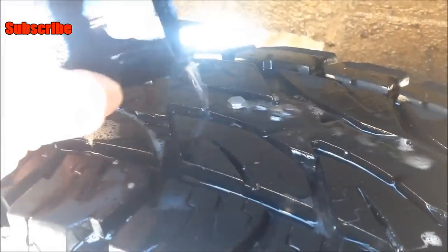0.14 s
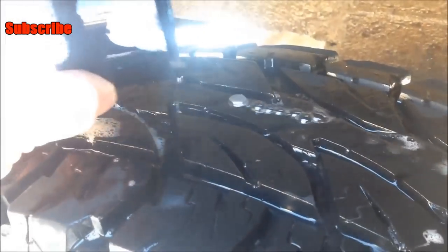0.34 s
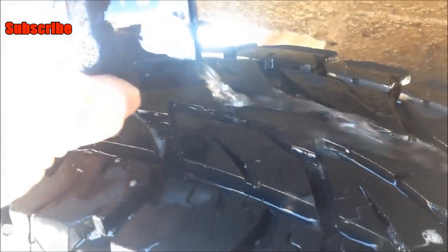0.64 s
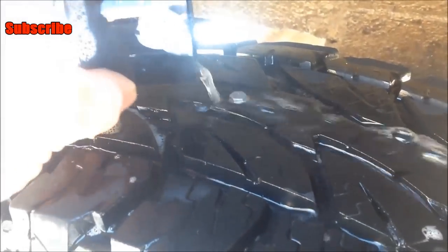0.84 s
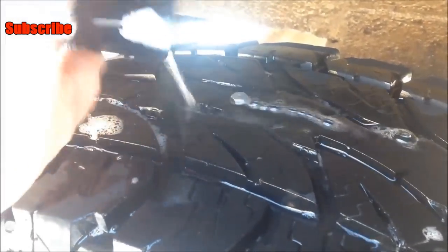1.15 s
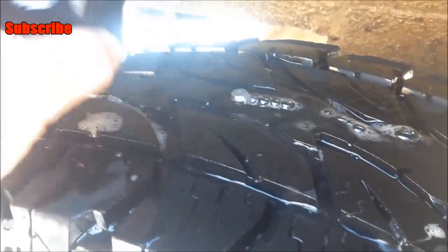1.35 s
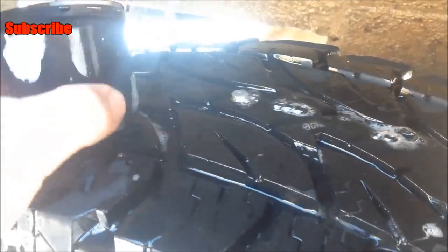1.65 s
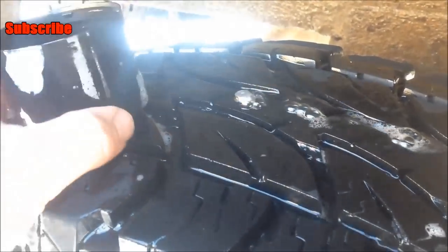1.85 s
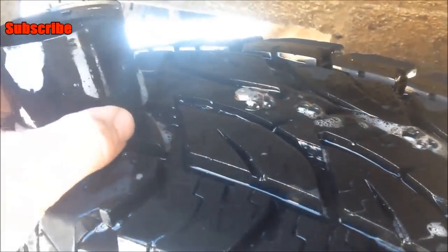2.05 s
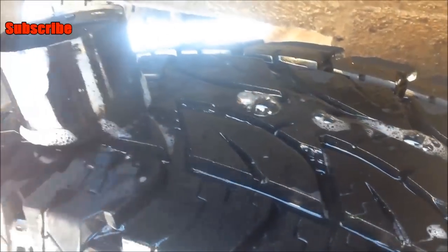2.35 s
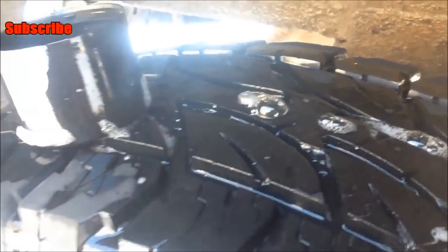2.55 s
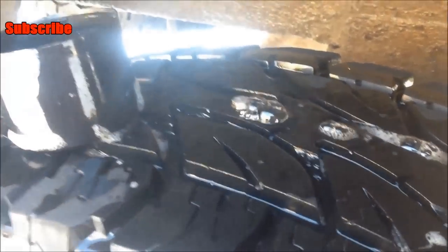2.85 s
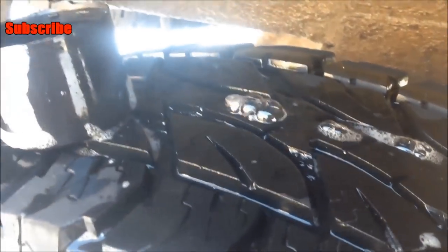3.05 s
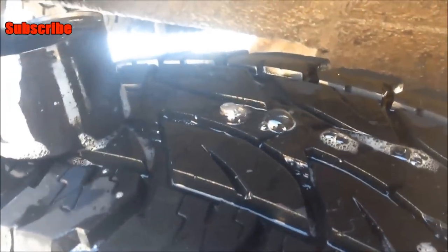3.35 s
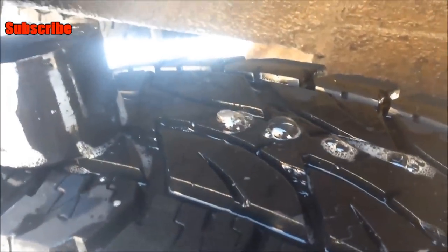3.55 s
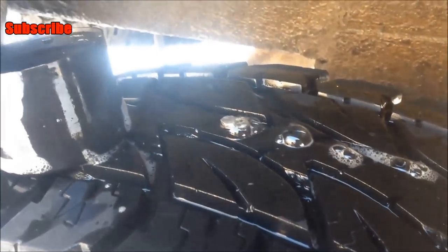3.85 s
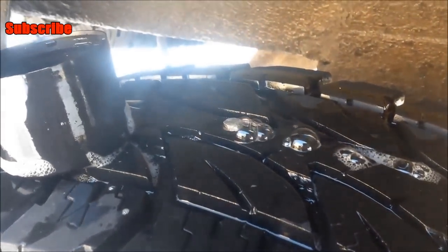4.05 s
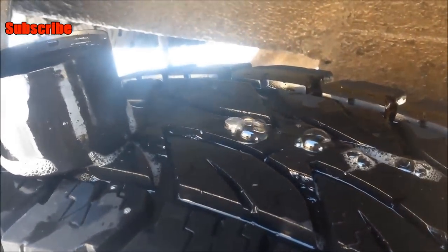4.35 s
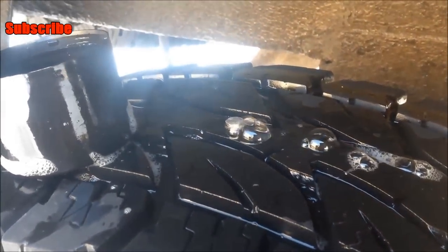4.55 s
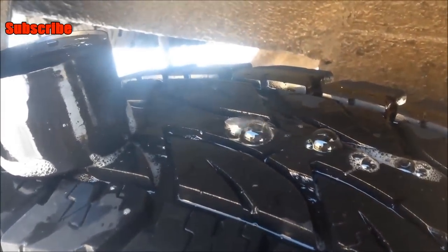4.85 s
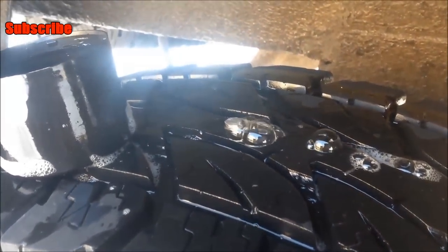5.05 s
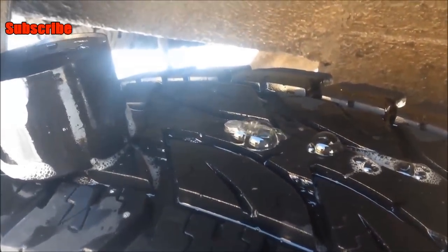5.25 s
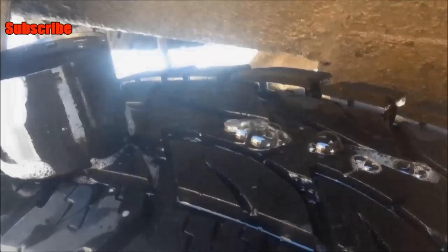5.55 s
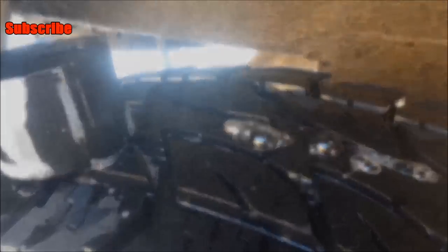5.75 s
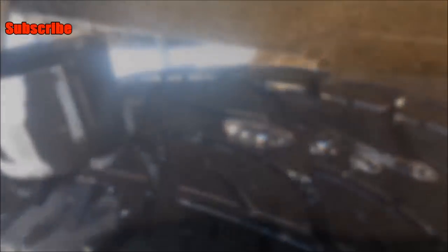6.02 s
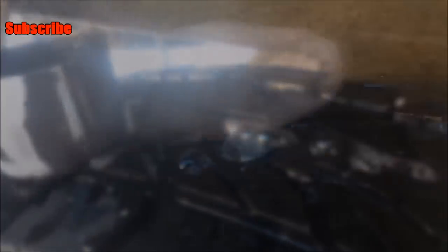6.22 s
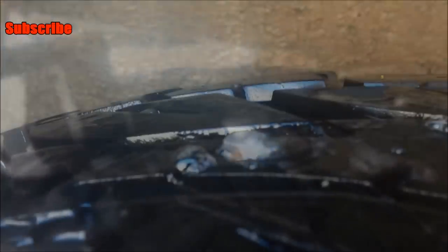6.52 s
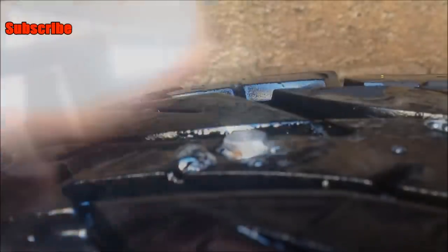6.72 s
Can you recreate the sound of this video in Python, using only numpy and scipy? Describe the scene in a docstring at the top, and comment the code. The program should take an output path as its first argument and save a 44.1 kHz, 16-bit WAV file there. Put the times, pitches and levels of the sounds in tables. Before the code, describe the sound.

A tire puncture covered in soapy water spits a quick, wet stream of tiny bubbles, heard up close. After a brief lull, bright pops come in rapid clusters, with crackling foam and a faint, fluttering hiss of air. A single soft bump touches the microphone. Outdoor road noise stays low behind the leak until it suddenly rises and hums toward the end.

```python
"""Outdoors, close to a small camera, air leaks from a punctured tire through soapy water.
While water is poured on, the hole sputters a fast stream of bubbles; then it spits them in short bursts
over fizzing foam and a thin hiss. Each bubble pops, rings briefly and echoes off the tread and the
vehicle. The camera is bumped once. Traffic rumbles; at a cut near 5.5 s it abruptly turns louder,
with a few hums."""
import sys
import numpy as np
from scipy import signal
from scipy.fft import rfft, irfft, next_fast_len
from scipy.io import wavfile
from scipy.ndimage import uniform_filter1d, map_coordinates

SR = 44100
rng = np.random.default_rng(int(sys.argv[2]) if len(sys.argv) > 2 else 0)


def dump_mix(stems):
    """Bounce the given channels to the path in sys.argv[1] as a 16-bit WAV at rate SR."""
    frames = np.atleast_2d(stems).T  # one column per channel
    limited = np.clip(frames, -1, 1)  # hard clip at full scale
    pcm = np.round(limited * 32767).astype(np.int16)
    wavfile.write(sys.argv[1], SR, pcm)


N = 303408


def amp(db):
    """Turn decibels into a number to multiply by."""
    return 10 ** (np.asarray(db) / 20)


def unit(x):
    """Scale a signal to an average power of 1."""
    return x / np.sqrt(np.mean(x ** 2) + 1e-20)


def colour_gain(colour, hz):
    """The gain at each frequency, read between rows of frequency in Hz and level in dB."""
    row_hz, row_db = np.transpose(colour)
    return amp(np.interp(np.log(hz + 1), np.log(row_hz + 1), row_db))


def curves(rows):
    """Join timed rows with straight lines: one curve for each column after the time."""
    times, *columns = np.transpose(rows)
    return [np.interp(np.arange(N) / SR, times, column) for column in columns]


def wobble(rate):
    """A smooth random curve that passes through `rate` new values a second."""
    return map_coordinates(rng.standard_normal(int(N * rate / SR) + 4), [np.arange(N) * rate / SR])


def filtered(x, response):
    """Turn each frequency of x up or down by response(hz)."""
    size = next_fast_len(N + 8192)
    return irfft(rfft(x, size) * response(np.fft.rfftfreq(size, 1 / SR)), size)[..., :N]


def rush(colour, patchy_db):
    """Noise of a given tone colour, with random louder and softer patches in time and pitch."""
    grid = signal.stft(rng.standard_normal(N), nperseg=512)[2]
    patches = uniform_filter1d(rng.standard_normal(grid.shape), size=6, axis=0)
    patches = uniform_filter1d(patches, size=10, axis=1)
    noise = signal.istft(grid * amp(patchy_db * unit(patches)), nperseg=512)[1][:N]
    return unit(filtered(noise, lambda hz: colour_gain(colour, hz)))


def bubbles(starts, peak_db, pitch_hz, open_db, puff_db, width_hz, size=1024):
    """Each bubble snaps, partly in the open and partly through its own ring, and adds a duller puff."""
    # The tone colour of a snap. Each row: frequency in Hz, relative level in dB.
    snap_colour = [(1000, -40), (2000, -32.5), (3100, -25), (4100, -15.5), (5200, -4), (6050, -3),
                   (7200, -12), (8300, -14), (9300, -24), (10300, -28), (11500, -48.5), (13400, -44),
                   (15500, -43.5)]
    # Echoes off the tread and the vehicle. Each row: delay in seconds, level in dB.
    echoes = [(.0014, -27), (.0024, -26), (.0041, -14.5), (.0061, -22.5), (.008, -22.5)]
    hz = np.fft.rfftfreq(size, 1 / SR)
    draw = rng.standard_normal((len(starts), len(echoes) + 2))
    cepstrum = irfft(np.log(colour_gain(snap_colour, hz)), size)
    cepstrum[1:size // 2] *= 2  # folded so that nothing sounds before the bubble bursts
    cepstrum[size // 2 + 1:] = 0
    snap = np.exp(rfft(cepstrum))
    pitch, width = pitch_hz[:, None], width_hz * amp(2.9 * draw[:, :1])
    ring = pitch ** 2 / (pitch ** 2 - hz ** 2 + 1j * hz * width)  # also passes what lies below its pitch
    film = (pitch ** 2 / (pitch ** 2 - hz ** 2 + 1.1j * hz * pitch)) ** 2  # water muffles what is above
    open_share = amp(open_db + 4 * draw[:, 1])[:, None]
    paths = 1 + sum(amp(db + 0.84 * draw[:, k + 2:k + 3]) * np.exp(-2j * np.pi * hz * delay)
                    for k, (delay, db) in enumerate(echoes))
    t = np.arange(size // 2) / SR
    noise = rng.standard_normal((len(starts) + 1, size // 2))
    common = .45  # all bubbles share this much of the echo tail: the surroundings stay put
    tail = np.sqrt(common) * noise[0] + np.sqrt(1 - common) * noise[1:]
    space = paths + rfft(tail * amp(-26.5 - 60 * t / 0.037) * (t > .0008), size)
    sounds = irfft(snap * (open_share + ring * film) * space, size)
    sounds *= (amp(peak_db) / np.abs(sounds).max(1))[:, None]
    puff = (1j * hz * 2600 / (2900 ** 2 - hz ** 2 + 1j * hz * 2600)) ** 2
    sounds += amp(puff_db)[:, None] * irfft(puff * space, size)
    at = np.round(starts * SR).astype(int)[:, None] + np.arange(size)
    return np.bincount(at.ravel(), sounds.ravel(), N + size)[:N]  # add each one in at its time


def stream():
    """Under a film of water the hole lets go of a fast, uneven run of bubbles; small ones fill gaps."""
    # The flooded hole. Each row: time in seconds, relative level in dB, bubble pitch in Hz,
    # share of the snap heard in the open in dB.
    flooded_hole = [(0, -15, 5300, -7), (.188, -14, 5830, -17), (.21, -24, 4220, -5), (.25, -21, 7400, 5),
                    (.3, -17, 5500, -2), (.33, -17.5, 5700, 6), (.36, -21, 7500, 4), (.39, -23, 6000, 0),
                    (.402, -13, 6200, -5), (.476, -28, 6300, 3), (.51, -24, 8000, 6), (.552, -20, 6800, 0),
                    (.58, -19, 5740, -16), (.61, -34, 4600, 0), (.68, -38, 5070, -2), (.76, -32, 5830, 0),
                    (.814, -19, 7150, -5), (.9, -16.5, 5450, -6), (1.05, -19.5, 6430, -3),
                    (1.16, -21.5, 5570, 1), (1.25, -16, 6300, -17), (1.29, -18, 9900, 1),
                    (1.432, -24, 10000, 0), (1.45, -54, 9600, 0)]
    end = flooded_hole[-1][0] * SR
    level_db, pitch_hz, open_db = curves(flooded_hole)
    per_second = 138 - 1.57 * (level_db + 20)  # weaker, smothered bubbles come faster
    puff_db = -21.5 + 1.4 * np.minimum(level_db + 29, 0)  # when smothered, the puff fades too
    count = .8 + np.cumsum(per_second * amp(1.6 * wobble(70))) / SR
    big = np.flatnonzero(np.diff(np.floor(count)))
    big = big[big < end]
    small = (rng.random(400) * end).astype(int)
    at = np.r_[big, small]
    lift_db = np.r_[np.full(len(big), 9.), np.full(len(small), -6.)]
    draw = rng.standard_normal((len(at), 3))
    peak_db = level_db[at] + lift_db + 1.8 * draw[:, 0]
    ring_hz = pitch_hz[at] * (1 + 0.057 * draw[:, 1] + 0.029 * wobble(30.1)[at])
    return bubbles(at / SR, peak_db, ring_hz, open_db[at],
                   puff_db=puff_db[at] + lift_db + 2.8 * draw[:, 2], width_hz=pitch_hz[at, None] / 11)


def hollows(hz):
    """The spaces around the tire lift some pitches of the leak and thin out others."""
    # Hollows that ring faintly. Each row: frequency in Hz, width in Hz, lift in dB.
    resonances = [(2900, 60, 3), (3150, 60, 3), (3340, 55, 4), (3880, 50, 4), (4290, 60, 6), (4830, 50, 5),
                  (5090, 40, 2.5), (5280, 70, 4.5), (5510, 110, 2), (6050, 200, 3.5), (7440, 90, 3)]
    # Where echoes off the tread cancel. Each row: frequency in Hz, width in Hz, depth in dB.
    dips = [(2450, 60, -7), (3610, 80, -7), (4070, 150, -9), (4930, 60, -9), (5640, 60, -11),
            (7080, 110, -6), (8270, 110, -5)]

    def bump(centre, width, db):
        return (amp(db) - 1) * 1j * hz * width / (centre ** 2 - hz ** 2 + 1j * hz * width)

    lifted = 1 + sum(bump(*row) for row in resonances)
    return lifted * np.prod([1 + bump(*row) for row in dips], axis=0)


def spray():
    """A thin, high hiss flutters, and a few tiny droplets burst."""
    # How loud the hiss is. Each row: time in seconds, level in dB.
    hiss_levels = [(0, -66), (1.15, -54.5), (1.9, -57.5), (2.57, -52.5), (3.14, -58.5), (3.6, -64),
                   (3.83, -58), (3.95, -57.5), (4.9, -55.5), (5.12, -59.5), (5.75, -51.5), (6.38, -46.5),
                   (6.88, -52.5)]
    # The tone colour of hiss and droplets. Each row: frequency in Hz, relative level in dB.
    air_colour = [(5290, -38), (9000, -8.5), (10900, -2.5), (11600, -14), (12700, -5), (13400, -2.5),
                  (14200, -10), (15800, -25)]
    # Bursting droplets. Each row: start in seconds, relative level in dB.
    droplets = [(0.6904, -47), (0.701, -37), (0.7128, -40), (0.7332, -40), (0.7474, -34), (0.7537, -30),
                (0.797, -24)]
    spits, t = np.zeros(N), np.arange(256) / SR
    for start, db in droplets:
        fade = amp(db + 7.5 - 60 * t / 0.0062)
        spits[round(start * SR):][:len(t)] = fade * rng.standard_normal(len(t))
    hiss = amp(curves(hiss_levels)[0] + 2.4 * wobble(22)) * rush(air_colour, patchy_db=1.5)
    return hiss + filtered(spits, lambda hz: colour_gain(air_colour, hz))


def traffic(cut_s=5.545):
    """Tires roar and engines rumble on a road; after the cut they are louder and wavering tones join."""
    # How loud the road roars before the cut. Each row: time in seconds, level in dB.
    road_levels = [(0, -49), (.5, -51), (2.19, -51.5), (2.5, -49), (3.0, -50), (3.46, -45), (3.9, -49.5),
                   (4.7, -47.5), (5.45, -47.5)]
    # Tone colours of tires and engines, before and after the cut.
    # Each row: frequency in Hz, relative level in dB.
    roar_quiet = [(180, -31), (300, -14), (680, 5), (1290, -1), (1590, 0), (1780, -7.5), (1980, -2.5),
                  (2470, -11), (3000, -9), (3900, -11), (6600, -120)]
    roar_loud = [(180, -45), (300, -18), (738, 0), (1020, -1.5), (1110, -5), (1350, -5.5), (1590, -11.5),
                 (2350, -17.5), (3120, -18.5), (4000, -21), (5200, -50), (8800, -120)]
    rumble_quiet = [(12, -52), (20, -17), (75, -15), (144, -1.5), (188, -1), (219, -6), (259, -3),
                    (360, -9.5), (420, -1.5), (550, -3), (920, -120)]
    rumble_loud = [(12, -64), (20, -24), (85, -16), (107, -8.5), (155, 2.5), (198, -5), (231, -8),
                   (317, -17), (420, -18), (550, -19), (920, -120)]
    # Engine-like tones. Each row: start in seconds, pitch in Hz, level in dB.
    hums = [(5.56, 121, -57), (5.56, 198, -52.5), (6.5, 737, -40.5)]
    t = np.arange(N) / SR
    after_cut = t > cut_s
    roar_db = np.where(after_cut, -37.5, curves(road_levels)[0])
    rumble_db = np.where(after_cut, -48.5, -58.5) + wobble(2.36)
    roar = np.where(after_cut, rush(roar_loud, patchy_db=1.5), rush(roar_quiet, patchy_db=1.5))
    rumble = np.where(after_cut, rush(rumble_loud, patchy_db=1.4), rush(rumble_quiet, patchy_db=2.0))
    tones = np.zeros(N)
    for start, hz, db in hums:
        level = amp(db + 1.1 * wobble(12)) * np.clip((t - start) / 0.062, 0, 1)
        tones += level * np.sin(2 * np.pi * hz * t + 0.78 * wobble(6.2))
    return amp(roar_db) * roar + amp(rumble_db) * rumble + tones


def fizz():
    """Once the water has run off, foam crackles at random over the hiss of seeping air."""
    # How strongly the foam fizzes. Each row: time in seconds, relative level in dB.
    fizz_levels = [(1.3, -29), (1.66, -36), (1.97, -41), (2.18, -30.5), (2.53, -34.5), (3.3, -36.5),
                   (3.5, -37.5), (3.7, -33.5), (4.3, -40.5), (4.7, -33.5), (5.4, -40.5), (5.82, -27),
                   (6.88, -30)]
    # The tone colour of seeping air. Each row: frequency in Hz, relative level in dB.
    seep_colour = [(880, -70), (1500, -35), (4050, -10.5), (4220, -10.5), (4780, -12.5), (5990, 2),
                   (7130, -12.5), (7950, -7.5), (9390, -57), (11000, -33), (14300, -68), (22000, -120)]
    start = fizz_levels[0][0]
    drained = np.clip((np.arange(N) / SR - start) / 0.042, 0, 1)
    fizz_db, = curves(fizz_levels)
    draw = rng.random((500, 3))
    at = (start * SR + draw[:, 0] * (N - start * SR - 1)).astype(int)
    peak_db = fizz_db[at] + 1.5 - 1.4 * np.log(draw[:, 1] + 0.00082)  # a few stand out
    crackle = bubbles(at / SR, peak_db, pitch_hz=5400 + 3000 * draw[:, 2],
                      open_db=12.5, puff_db=peak_db - 14, width_hz=2000)
    seep = amp(fizz_db - 9 + 4.5 * wobble(40)) * rush(seep_colour, patchy_db=3.0)
    return drained * (crackle + seep)


def pops():
    """Air forces bubbles through the thin foam one by one, in bursts; the louder ones ring more."""
    # Bursts of pops. Each row: start in seconds, number of pops, gap in milliseconds,
    # first peak in dB, change from pop to pop in dB.
    bursts = [(1.4517, 2, 14, -15, 1.5), (1.4884, 5, 7.5, -8.5, -1.5), (1.5441, 3, 5, -15, 2.5),
              (1.5621, 3, 9, -15.5, 1.0), (1.5983, 3, 6.5, -14.5, -0.5), (1.6405, 3, 6, -16.5, -0.5),
              (1.6979, 2, 5, -14.5, 2.5), (1.7177, 1, 0.0, -17.5, 0.0), (1.7386, 6, 8.5, -13.5, -0.5),
              (1.7828, 2, 9.5, -15.5, -2), (1.8564, 2, 4.5, -9, -3.5), (1.8988, 1, 0.0, -13, 0.0),
              (1.986, 1, 0.0, -11, 0.0), (1.9929, 2, 15.9, -9.5, -1.5), (2.0396, 1, 0.0, -26, 0.0),
              (2.051, 3, 6.5, -15, 1.5), (2.0997, 3, 11.0, -11.5, -1), (2.13, 2, 3.9, -12, -7),
              (2.153, 3, 6.5, -14, 2), (2.1808, 3, 7, -14, 1), (2.2186, 2, 11.5, -12, -4),
              (2.2347, 3, 6.9, -13, 0.5), (2.2741, 3, 9.6, -13, -1), (2.3098, 3, 7.5, -12.5, 1.0),
              (2.328, 1, 0.0, -15, 0.0), (2.3354, 3, 12.5, -9.5, -2.5), (2.3818, 2, 8.1, -10, -1),
              (2.407, 3, 7.0, -14, 0.5), (2.4618, 2, 14.5, -15, 3.5), (2.4941, 4, 10.5, -16, 2.0),
              (2.5463, 4, 6.5, -8.5, -0.5), (2.5766, 3, 7.5, -13.5, -1.0), (2.6408, 2, 5.5, -10, -7),
              (2.6767, 4, 8.5, -9, -3), (2.7135, 2, 5.1, -13.5, 4), (2.7246, 2, 14.5, -10, -2.5),
              (2.7636, 3, 8.5, -5, -3), (2.8034, 3, 6.4, -7.5, -0.5), (2.8306, 6, 7.5, -11.5, 0.0),
              (2.8969, 3, 5.5, -10.5, -1.5), (2.9336, 1, 0.0, -18, 0.0), (2.9555, 3, 5.5, -8.5, -1.5),
              (2.9806, 2, 7, -7, -4.5), (2.9917, 2, 10.5, -11, -3.5), (3.066, 2, 7.5, -18.5, 9.0),
              (3.1152, 1, 0.0, -11, 0.0), (3.1339, 3, 6.5, -8.5, -3.5), (3.1604, 2, 4.3, -6, -8),
              (3.19, 3, 7.5, -10.5, -1), (3.2184, 2, 14.2, -11.5, 1.5), (3.239, 2, 3.5, -12.5, 4.5),
              (3.2552, 3, 7.5, -13, -2.5), (3.2888, 4, 5.5, -5.5, -2), (3.3278, 3, 6.5, -7, -4.5),
              (3.3744, 1, 0.0, -21, 0.0), (3.3941, 2, 11.5, -7.5, -11.5), (3.439, 1, 0.0, -14, 0.0),
              (3.469, 6, 9, -9.5, 0.0), (3.5347, 2, 7, -13.5, -4), (3.6083, 2, 10.5, -16, 6),
              (3.6387, 2, 7.0, -8.5, -3.0), (3.6675, 6, 8.5, -11, 0.0), (3.735, 3, 9.5, -17, 4),
              (3.7672, 6, 8, -12.5, 0.5), (3.826, 3, 8, -9, -2.5), (3.8566, 4, 7.5, -11, 0),
              (3.8916, 1, 0.0, -13.5, 0.0), (3.9124, 1, 0.0, -14, 0.0), (3.9344, 2, 5.5, -5, -5),
              (3.9543, 2, 6.5, -10, -7.5), (3.9718, 3, 10.5, -12, 0.0), (4.0166, 2, 15, -10.5, 3),
              (4.0384, 2, 13.5, -14.5, 1), (4.0595, 1, 0.0, -10.5, 0.0), (4.0887, 3, 8.6, -10.5, -1.5),
              (4.1285, 1, 0.0, -12.5, 0.0), (4.1663, 3, 4, -11, 0.5), (4.2089, 2, 12.5, -12.5, 2),
              (4.2254, 1, 3, -16, 0.0), (4.2554, 2, 5, -12.5, 2), (4.2735, 1, 0.0, -14, 0.0),
              (4.2974, 2, 15.5, -15.5, 1), (4.3223, 4, 6.5, -14, 2.0), (4.3476, 2, 12, -13, -1),
              (4.3852, 3, 4.8, -16.5, 4), (4.4285, 3, 12.7, -12.5, -3.0), (4.4611, 4, 6.5, -11, 0.0),
              (4.4987, 1, 0.0, -17, 0.0), (4.5314, 2, 6, -5, -9), (4.574, 2, 6.5, -10.5, 0.5),
              (4.6024, 4, 7.5, -10.5, -0.5), (4.6424, 2, 5, -12.5, -0.5), (4.6657, 3, 6.5, -10.5, 0),
              (4.693, 1, 0.0, -13, 0.0), (4.7175, 2, 6.4, -12, 0.5), (4.7396, 2, 5.5, -16, 4.5),
              (4.783, 1, 0.0, -12.5, 0.0), (4.8143, 2, 7.5, -4.5, -10), (4.839, 5, 6.5, -9, -1.5),
              (4.8956, 1, 0.0, -12, 0.0), (4.9081, 2, 5, -19, 7), (4.957, 2, 7.5, -14.5, 4),
              (4.983, 2, 13, -9, -8), (5.024, 2, 5, -11.5, 0.5), (5.0604, 2, 10.5, -11.5, 0.5),
              (5.1126, 3, 14.1, -11.5, -0.5), (5.149, 8, 9.5, -11, 0.0), (5.2272, 7, 9.5, -12, 0.0),
              (5.3215, 1, 0.0, -9.5, 0.0), (5.3407, 2, 8.1, -17.5, 6.5), (5.3766, 1, 0.0, -13, 0.0),
              (5.3996, 3, 8.0, -11.5, 1), (5.4348, 2, 10.7, -12, 3.5), (5.4704, 2, 5.5, -13.5, 3.5),
              (5.5009, 3, 9, -11, 0), (5.5453, 3, 6.5, -14, 1), (5.588, 2, 3.5, -11.5, 2),
              (5.6309, 1, 0.0, -7, 0.0), (5.6533, 4, 4.5, -13.5, 0.5), (5.6847, 6, 8, -12.5, -0.5),
              (5.732, 4, 8, -12, -1.0), (5.7761, 1, 0.0, -17, 0.0), (5.7839, 4, 5.5, -9, -1),
              (5.8303, 3, 11, -17.5, 1), (5.8733, 5, 7.5, -8, -0.5), (5.943, 2, 11, -11.5, -3.0),
              (6.0014, 1, 2, -12.5, 0.0), (6.031, 7, 8, -9, -1.0), (6.11, 7, 7.5, -12.5, -0.5),
              (6.175, 1, 0.0, -18, 0.0), (6.208, 3, 6.0, -13.5, -1.5), (6.2233, 5, 8.5, -14.5, 0),
              (6.2736, 4, 8, -16, 0.5), (6.3464, 2, 4.3, -17, 6), (6.3714, 1, 0.0, -10, 0.0),
              (6.4163, 1, 0.0, -17, 0.0), (6.4638, 3, 8.5, -13, 0.5), (6.4875, 2, 5.5, -18, 6),
              (6.5103, 3, 8.5, -15, 0), (6.5517, 3, 9, -13, -1), (6.5933, 2, 12, -15, 2),
              (6.644, 1, 0.0, -13.5, 0.0), (6.6778, 3, 10.5, -12, -3), (6.7142, 2, 8, -15, 4),
              (6.757, 3, 6.5, -13.5, 0.0), (6.7913, 4, 9, -13.5, -0.5), (6.8296, 3, 8.0, -18.5, -1.5),
              (6.86, 2, 12, -12, -5), (6.8766, 1, 0.0, -19, 0.0)]
    # Smaller, higher bubbles later in a burst. Each row: time in seconds, pitch in Hz, chance (0 to 1).
    small_bubbles = [(1.45, 7700, .8), (1.66, 7440, .8), (1.8, 9800, .3), (2.3, 9100, .2), (2.6, 8500, .15),
                     (3.3, 7900, .06), (4.1, 9400, .08), (4.4, 9300, .4), (4.7, 7600, .2), (5.1, 8500, .3),
                     (5.9, 8500, .4), (6.1, 7800, .35), (6.88, 8200, .25)]
    starts, db, place = np.transpose([(start + k * gap_ms / 1000, first_db + k * step_db, k)
                                      for start, count, gap_ms, first_db, step_db in bursts
                                      for k in range(round(count))])
    draw, pick = rng.standard_normal((len(starts), 3)), rng.random((len(starts), 2))
    first = np.diff(starts, prepend=0) > .017  # the first pop after a pause is a larger, lower bubble
    starts = starts + .0004 * draw[:, 0] * (place > 0)
    db = db + 0.82 * draw[:, 1]
    at = np.minimum(starts * SR, N - 1).astype(int)
    small_hz, small_chance = (curve[at] for curve in curves(small_bubbles))
    first_hz, usual_hz, spread_hz = 5620, 6017, 223
    later_hz = np.where(pick[:, 0] < small_chance, small_hz, usual_hz)
    pitch_hz = np.where(first, first_hz, later_hz) + spread_hz * draw[:, 2]
    ticked = first & (pick[:, 1] < .25)  # at times a faint tick comes just ahead of a first pop
    starts = np.r_[starts, starts[ticked] - .0065]
    db = np.r_[db, db[ticked] - 20]
    pitch_hz = np.r_[pitch_hz, pitch_hz[ticked]]
    width_hz = 750 + .45 * np.abs(pitch_hz[:, None] - 6050)  # unusual sizes ring less
    return bubbles(starts, db, pitch_hz, open_db=6.5 - 0.3 * db, puff_db=-17.5 + 0.23 * db,
                   width_hz=width_hz)


def camera_bump():
    """A knock on the camera: a sharp push that swings back and dies away."""
    # Each row: start in seconds, level in dB, pitch in Hz, seconds to fade by 60 dB.
    knocks = [(2.8488, -21.5, 183, 0.023)]
    out, t = np.zeros(N), np.arange(4096) / SR
    for start, db, hz, fade_s in knocks:
        swing = np.cos(2 * np.pi * hz * (t + .0012 * (1 - np.exp(-t / 0.00076))))  # starts high, settles
        level = amp(db - 60 * t / fade_s) * np.clip(t / 0.0004, 0, 1)
        out[round(start * SR):][:len(t)] += level * swing
    return out


def rustle(peak_s=7.1, half_length_s=0.087, peak_db=-36):
    """A soft swell of noise that peaks after the end, so only its very faint beginning plays."""
    # The tone colour of the swell. Each row: frequency in Hz, relative level in dB.
    rustle_colour = [(500, -40), (1200, -3), (2500, 6), (5000, -9), (9000, -34)]
    swell = np.exp(-((np.arange(N) / SR - peak_s) / half_length_s) ** 2)
    return amp(peak_db) * swell * rush(rustle_colour, patchy_db=2.0)


def scene():
    """The leak, coloured by the tire's hollows, and the sounds around it, in one channel."""
    leak = filtered(stream() + pops() + fizz(), hollows)
    return (leak + spray() + rustle() + traffic() + camera_bump())[None]


def record(dry):
    """The microphone rounds off the loudest peaks and loses the deep bass and the highest treble."""
    ceiling, bass_hz, top_hz = .92, 70, 15900
    rounded = dry / (1 + np.abs(dry / ceiling) ** 5) ** (1 / 5)
    return filtered(rounded, lambda hz: (1j * hz / (bass_hz + 1j * hz)) ** 2 * (hz < top_hz))


dry = scene()
out = record(dry)
dump_mix(out)
```